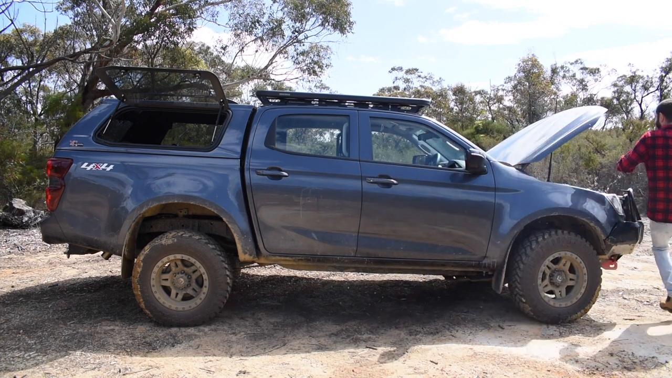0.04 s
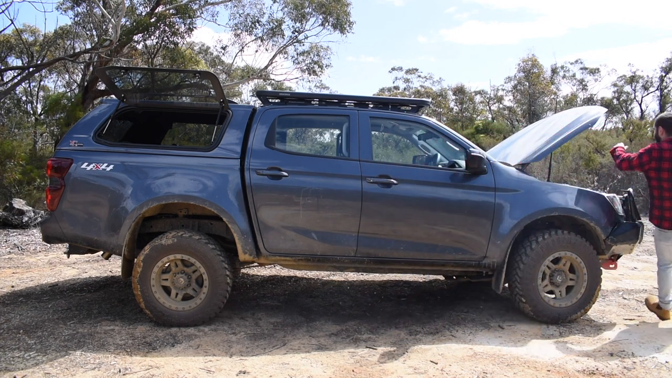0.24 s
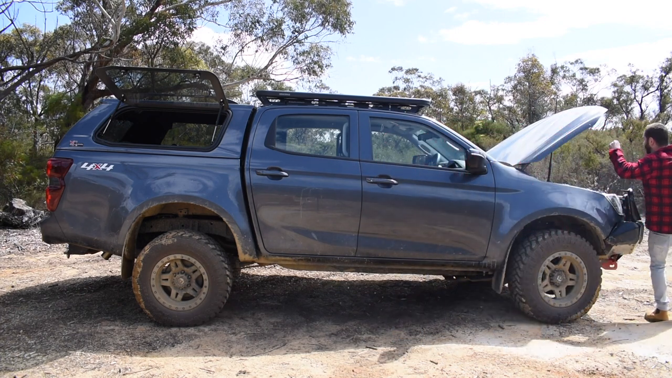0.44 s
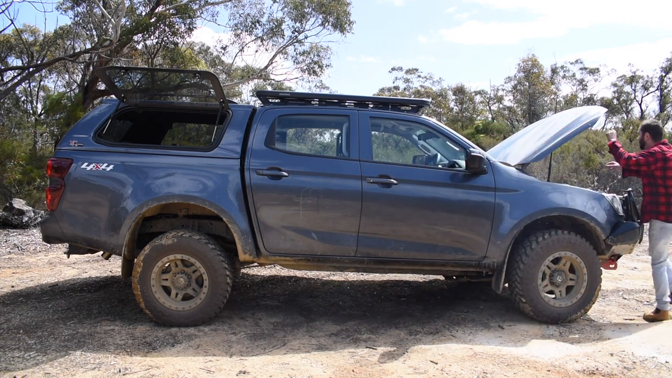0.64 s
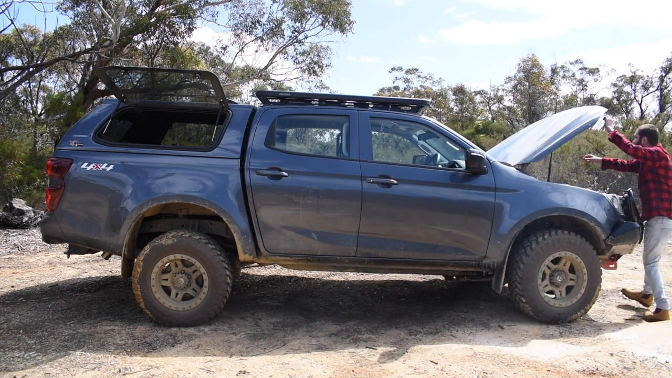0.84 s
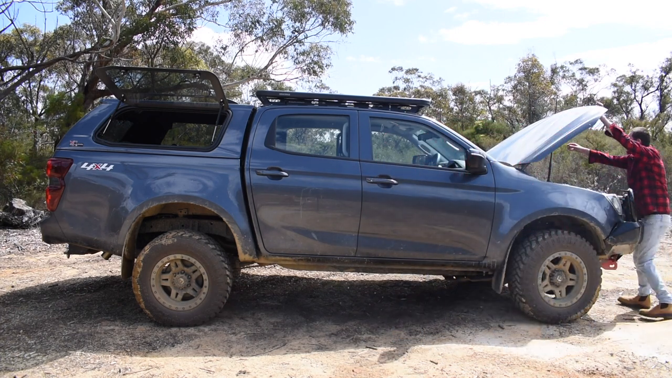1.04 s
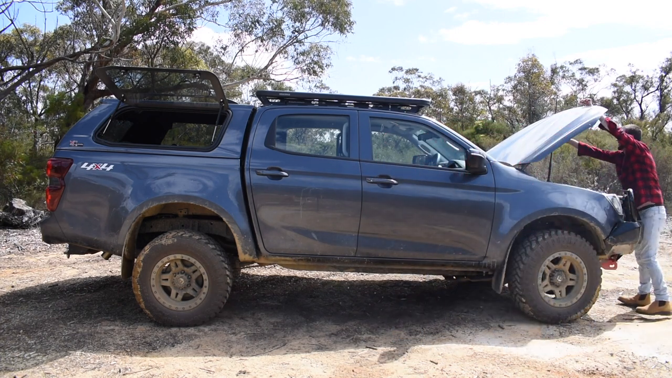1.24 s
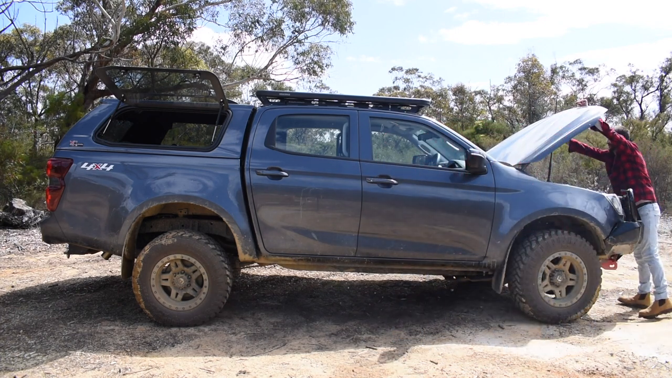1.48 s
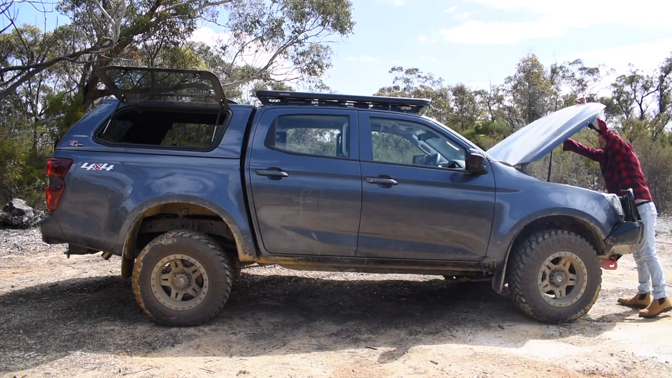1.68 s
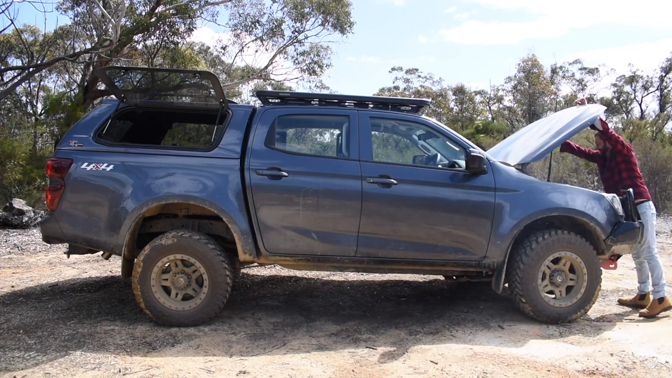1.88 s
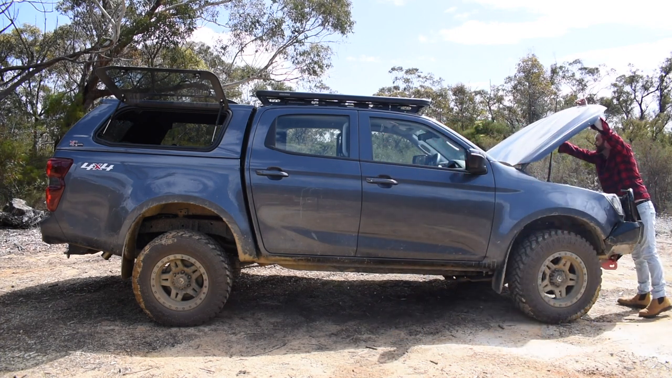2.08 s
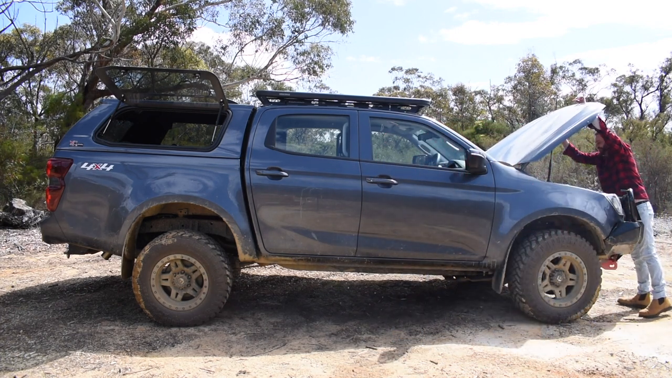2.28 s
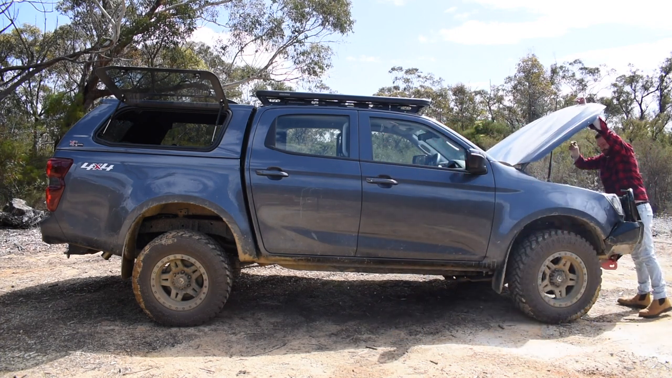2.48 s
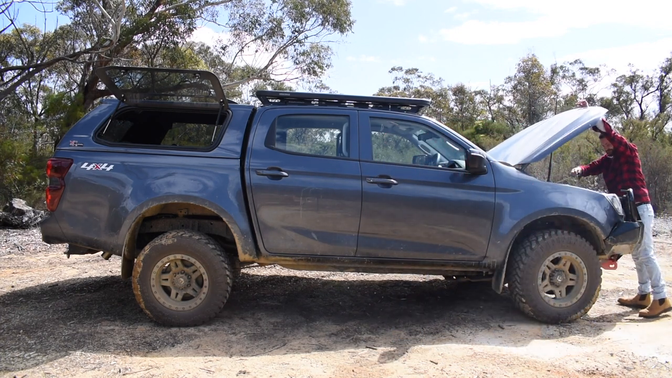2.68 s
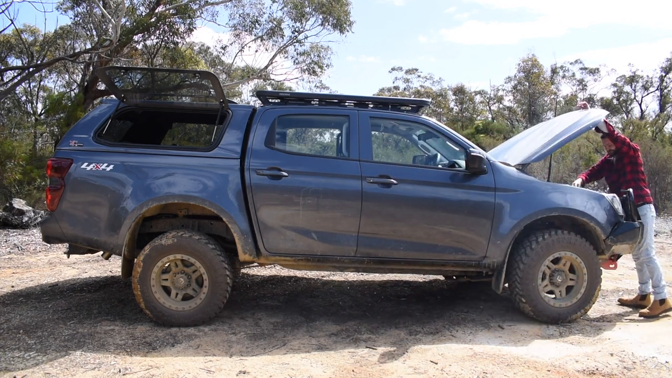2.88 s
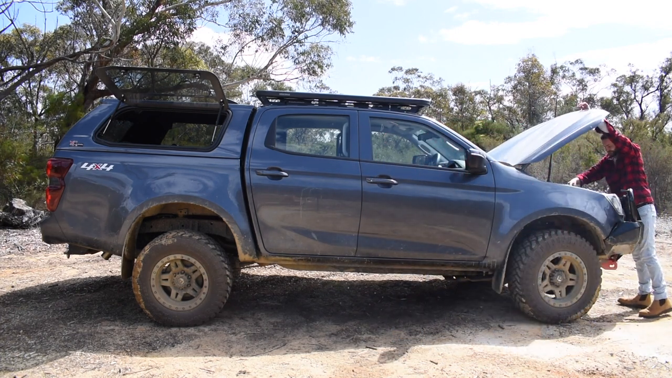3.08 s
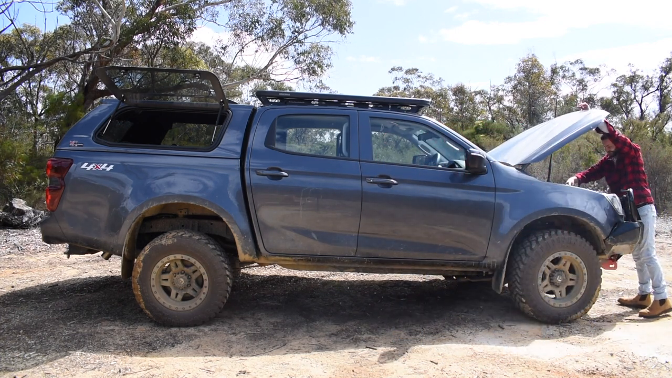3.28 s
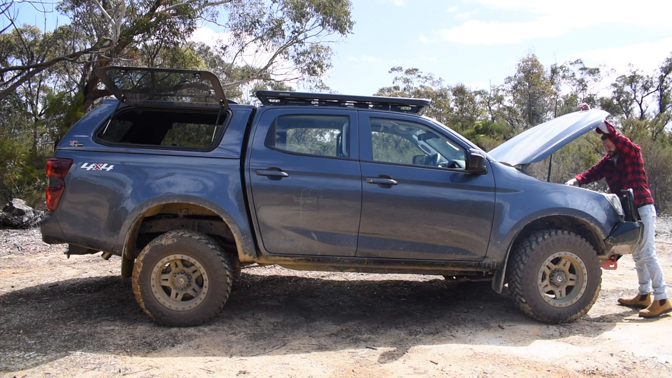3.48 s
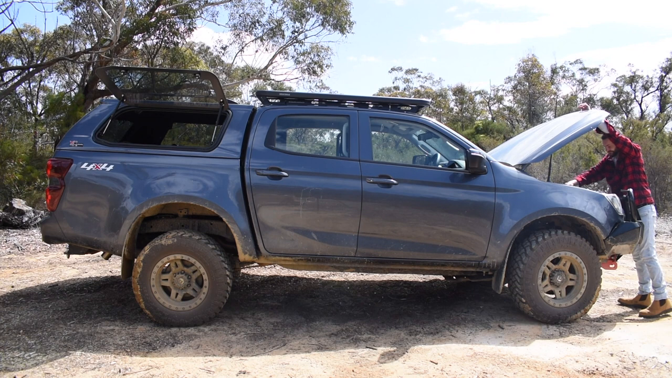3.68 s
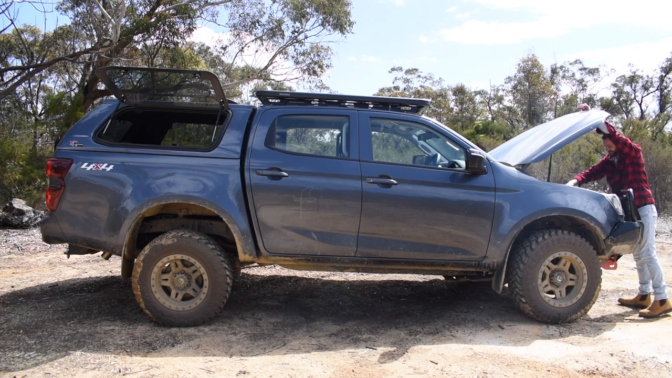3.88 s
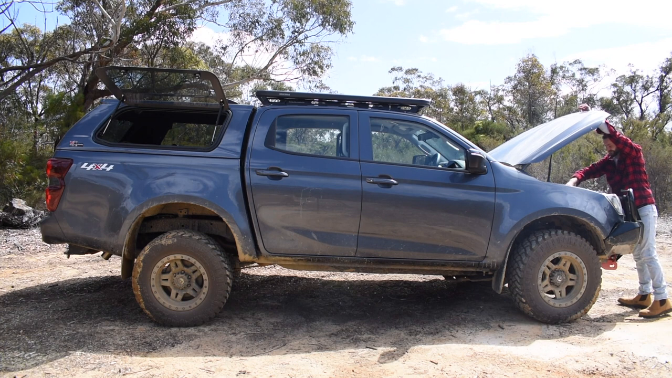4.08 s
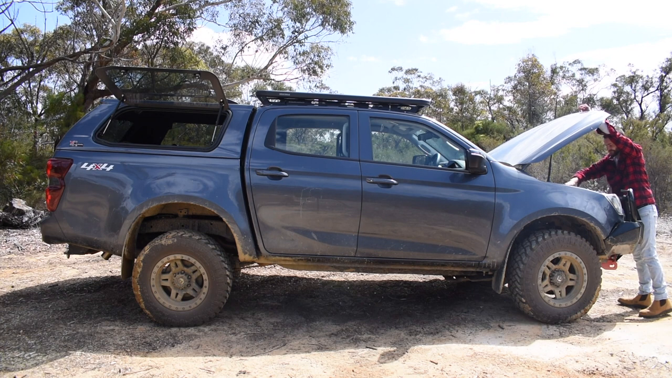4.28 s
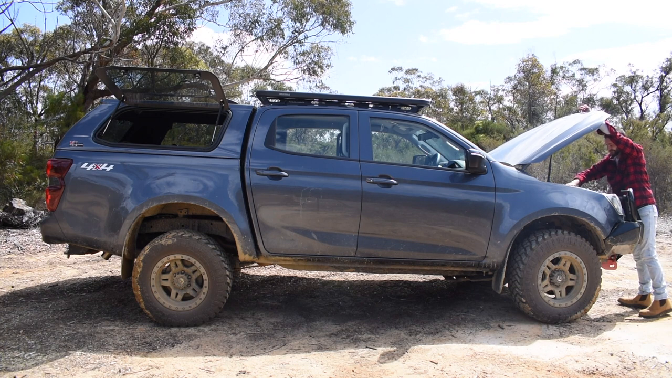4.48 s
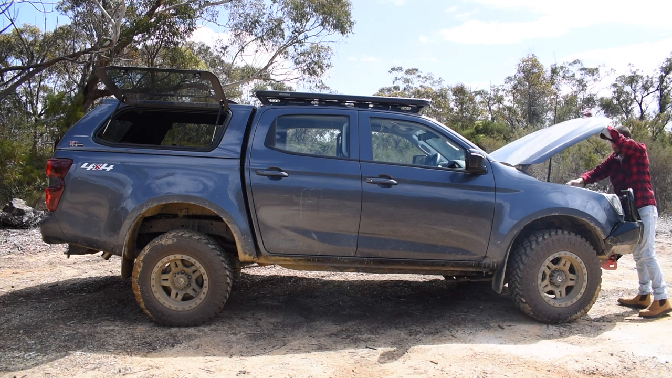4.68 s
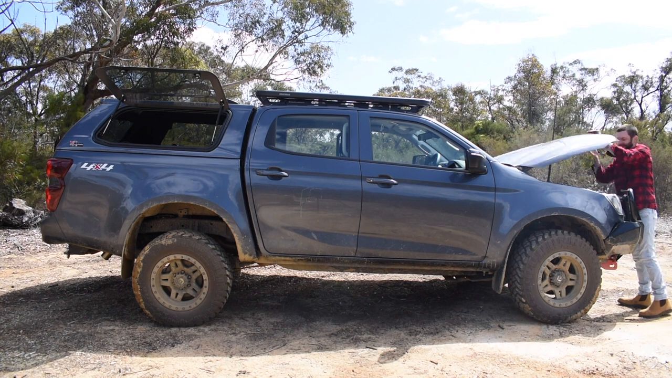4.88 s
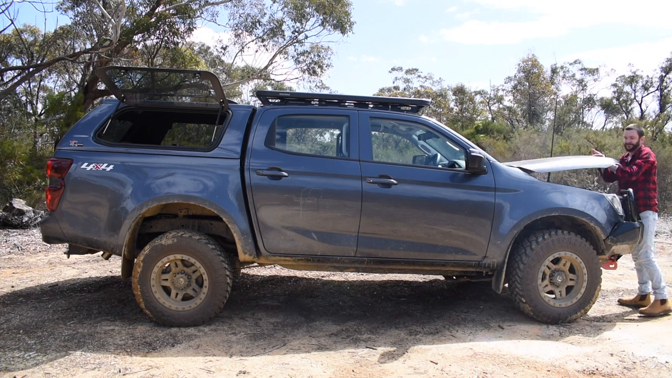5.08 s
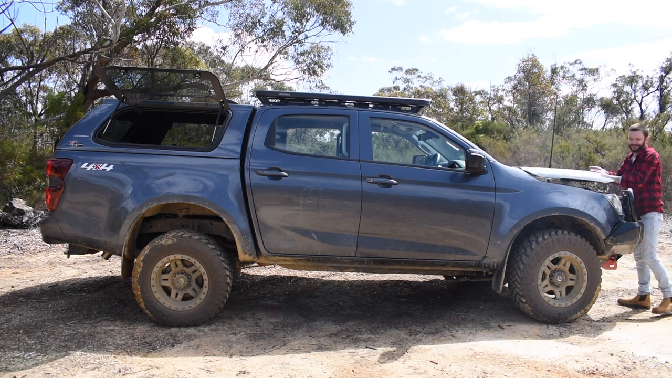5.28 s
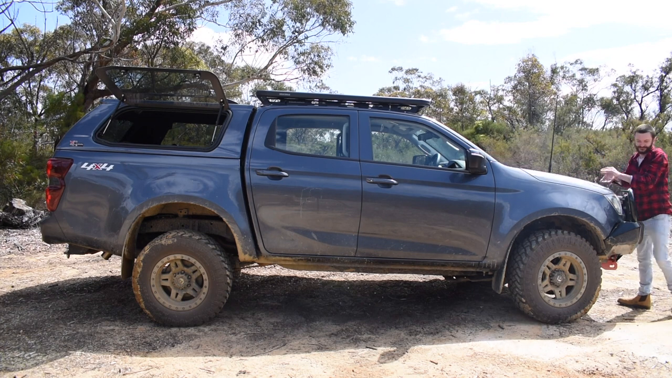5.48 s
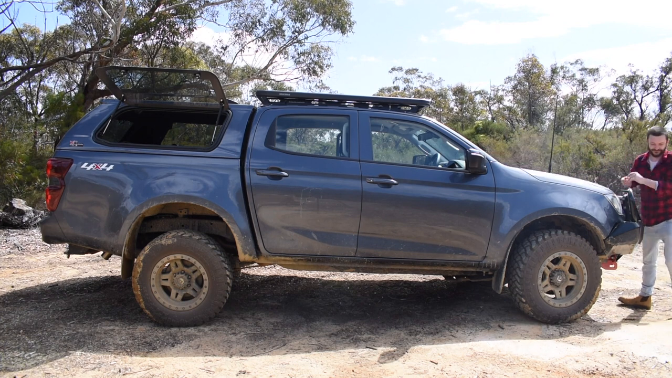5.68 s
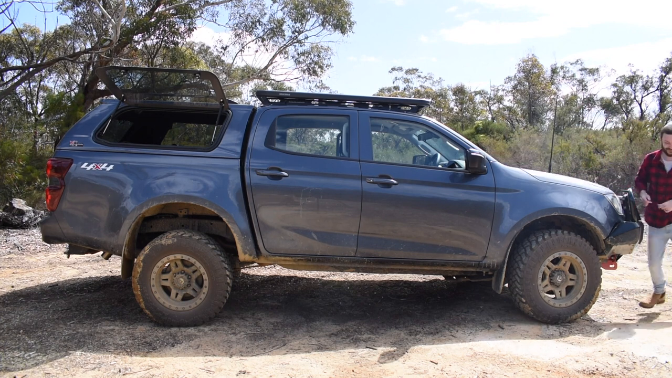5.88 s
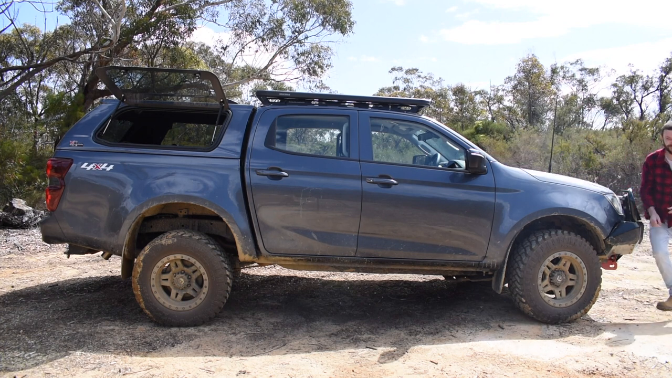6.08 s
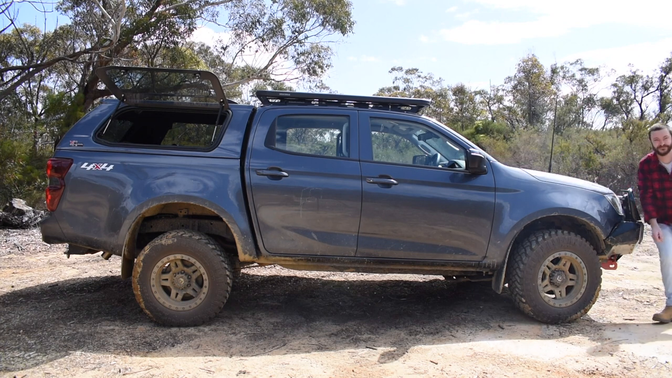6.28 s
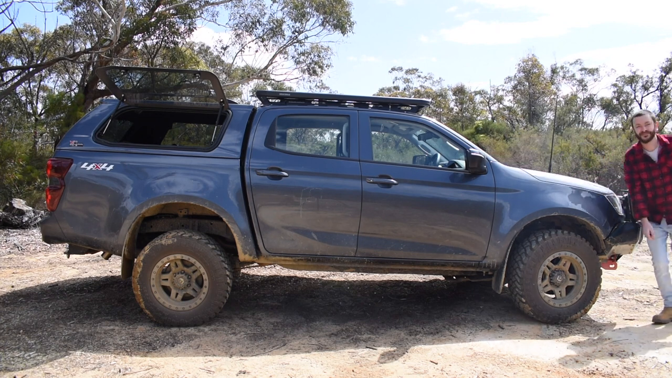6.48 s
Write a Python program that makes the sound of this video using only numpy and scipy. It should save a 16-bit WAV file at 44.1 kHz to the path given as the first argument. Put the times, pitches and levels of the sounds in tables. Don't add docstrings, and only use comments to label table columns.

```python
import sys
import numpy as np
from scipy import signal
from scipy.fft import rfft, irfft, next_fast_len
from scipy.io import wavfile
from scipy.ndimage import uniform_filter1d

SR = 44100
rng = np.random.default_rng(int(sys.argv[2]) if len(sys.argv) > 2 else 0)


def materialize(psi):
    bounded = np.clip(np.atleast_2d(psi).T, -1, 1)
    quanta = np.round(bounded * 32767).astype(np.int16)
    wavfile.write(sys.argv[1], SR, quanta)


def magnitude_from_level(level_db):
    exponent = np.asarray(level_db, float) / 20
    return 10 ** exponent


N = 288069

# frequency in Hz, level in dB per Hz.
SCUFF_TONE = [(88, -45), (150, -4), (431, -11), (790, -1.5), (960, -8.5), (1190, -6.5), (1360, -16),
              (11500, -33.5), (16000, -44.5)]
# frequency in Hz, t60 in seconds.
DRY_RING = [(200, 0.063), (1000, 0.0073), (4000, 0.036), (12000, .015)]
# frequency in Hz, t60 in seconds.
PROPPED_RING = [(40, 0.046), (120, 0.28), (230, 0.44), (400, 0.38), (800, 0.22), (2000, 0.18),
                (4000, 0.084), (12000, 0.058)]
# frequency in Hz, t60 in seconds.
ROD_RING = [(100, 0.29), (500, 0.16), (1500, 0.075), (3000, 0.061), (12000, 0.014)]
# frequency in Hz, t60 in seconds.
CLIP_RING = [(100, 0.5), (500, 0.17), (1500, 0.097), (3000, 0.05), (12000, 0.0214)]


def evened(x):
    return x / np.sqrt(np.mean(x ** 2) + 1e-20)


def read(points, hz):
    f, value = np.transpose(points)
    return np.interp(np.log(hz + 1), np.log(f + 1), value)


def coloured(tone, size, lo_hz=0, hi_hz=30000):
    fast = next_fast_len(size)
    hz = np.fft.rfftfreq(fast, 1 / SR) + 1
    edges = 1 / (1 + (lo_hz / hz) ** 6) / (1 + (hz / hi_hz) ** 6)
    spectrum = rfft(rng.standard_normal(fast)) * magnitude_from_level(read(tone, hz)) * edges
    return evened(irfft(spectrum, fast)[:size])


def rings(modes, size):
    hz, db, t60 = np.transpose(modes)[:, :, None]
    t = np.arange(size) / SR
    return (magnitude_from_level(db - 60 * t / t60) * np.sin(2 * np.pi * hz * t)).sum(0)


def crowd(tone, ring, lo_hz, hi_hz, size):
    t = np.arange(size) / SR
    middles = np.geomspace(lo_hz, hi_hz, num=6)
    place = np.interp(np.log(np.fft.rfftfreq(size, 1 / SR) + 1), np.log(middles), np.arange(6))
    share = np.maximum(1 - abs(place - np.arange(6)[:, None]), 0)
    bands = irfft(rfft(coloured(tone, size, lo_hz, hi_hz)) * share, size)
    swell = np.sin(np.pi / 2 * np.minimum(t * hi_hz / 2, 1)) ** 2
    return bands, swell * magnitude_from_level(-60 * t / read(ring, middles)[:, None])


def hits(rows, tone, ring, size, modes=None, crowd_db=0, hush=1.4, rise=0.0011, free=1.01, choke=.03, soft=0):
    out = np.zeros(N + size)
    t = np.arange(size) / SR
    strong = rings(modes, size) * np.minimum(t / rise, 1) if modes else 0
    crowds = crowd(tone, ring, 25, 960, size), crowd(tone, ring, 1000, 4800, size)
    hiss = coloured(tone, 4 * size, 4600, 15800)
    times = np.array([row[0] for row in rows])
    for s, db, clatter_db, rattle_db, contact in rows:
        onset = np.minimum(t / (rise + soft * contact), 1)
        grip = onset * np.exp(-(t / np.clip(contact, 3e-4, .05)) ** 2)
        roughness = rng.standard_normal(size=4096)
        spot = rng.integers(3 * size)
        push = roughness * (grip * (1 + 2.0 * np.exp(-t / 0.002)))[:len(roughness)]
        push = push / np.linalg.norm(push)
        bodies = np.array([(np.roll(bands, spot, axis=1) * decays).sum(0) for bands, decays in crowds])
        gap = np.min(times[times > s] - s, initial=1)
        factor = np.clip(min(free, gap / choke), .3, 1.3)
        damp = magnitude_from_level(-120 * t * (1 / factor - 1))
        panel, clatter = signal.fftconvolve(push[None], bodies * damp, axes=1)[:, :size]
        bright = grip + onset * magnitude_from_level(-60 * t / read(ring, 12000) / hush)
        rattle = hiss[spot:][:size] * bright
        parts = np.array([magnitude_from_level(crowd_db) * panel + strong * damp, clatter, rattle])
        peaks = np.sqrt(uniform_filter1d(parts[:, :len(roughness)] ** 2, size=200).max(axis=1))
        gains = magnitude_from_level(db - 5.5 + np.array([0, clatter_db, rattle_db])) / peaks
        out[round((s + .0015) * SR):][:size] += gains @ parts
    return out[:N]


def lumps(rate_hz, depth_db):
    knots = rng.standard_normal(2800)
    return magnitude_from_level(depth_db * np.interp(np.arange(N) / SR * rate_hz, np.arange(len(knots)), knots))


def air():
    # time in seconds, wind level in dB.
    gusts = [(0.0, -51.5), (0.42, -56), (0.65, -60.5), (1.45, -65.5), (1.89, -49.5), (2.05, -56),
             (2.6, -64), (3.31, -70), (3.69, -67), (4.04, -66.5), (4.51, -71), (4.62, -62), (4.86, -61),
             (5.47, -64.5), (5.62, -38), (5.65, -50), (5.86, -48.5), (6.53, -60.5)]
    # time in seconds, cloth hiss in dB.
    moving = [(0, -74.5), (.2, -83), (.45, -73.5), (.7, -76), (1.05, -72), (1.42, -73.5), (1.58, -76),
              (2.2, -81), (2.4, -78), (2.93, -79), (3.099, -85), (4.6, -82), (4.85, -77.5), (5.46, -72.5),
              (5.698, -73.5), (6.13, -80.5), (6.3, -74.5), (6.45, -73.5), (6.53, -68.5)]
    # frequency in Hz, level in dB per Hz.
    wind_tone = [(8.8, -40.5), (15, -4), (32, 6.5), (48, 0.5), (111, -15.5), (146, -35.5), (200, -22.5),
                 (260, -57.5), (440, -120)]
    rustle_tone = [(59, -36.5), (100, 10), (225, 1.5), (413, 0), (605, -6), (744, -4), (1500, -11),
                   (4500, -19.5), (5850, -51), (9900, -120)]
    hiss_tone = [(1760, -35), (3000, 6), (5580, -1.5), (6250, -7), (6860, -7), (12900, -12), (15000, -11.5),
                 (15700, -35)]
    t = np.arange(N) / SR
    wind_db = np.interp(t, *np.transpose(gusts))
    hiss_db = np.interp(t, *np.transpose(moving))
    rustle_db = -64.5 + 0.73 * (hiss_db + 76.5)
    grain = lumps(86, 1.4)
    wind = evened(coloured(wind_tone, N, 0, 180) * lumps(4.7, 1.0))
    rustle = evened(coloured(rustle_tone, N, 120, 6300) * grain * lumps(15, 2.3))
    fine_hiss = evened(coloured(hiss_tone, N, 5500) * grain)
    return magnitude_from_level(9.0 + wind_db) * wind + magnitude_from_level(rustle_db) * rustle + magnitude_from_level(hiss_db) * fine_hiss


def scuffs():
    # start in seconds, panel level in dB,
    # clatter and rattle in dB re panel, contact in seconds.
    scrapes = [(0.029, -61, 0.5, -10, 0.06), (0.465, -60.5, 2.5, -7, 0.081), (0.522, -48.5, -1, -10, 0.042),
               (0.628, -60.5, -1.5, -36, 0.056), (0.743, -49, -15, -44, 0.02), (0.572, -68, -20, 6, 0.0098),
               (1.4, -71, -20, 7, 0.02), (1.439, -66.5, -22, 11.5, 0.027), (1.512, -48, -23, -12, 0.019),
               (1.475, -69, -20, 7, 0.022), (1.545, -69, -20, 4, 0.021), (1.642, -47.5, -28, -38.5, 0.017),
               (3.009, -57.5, -3, -12, 0.076), (3.047, -65, 5, 2.5, 0.023),
               (4.078, -56.5, -10, -10.5, 0.029), (4.122, -61, 0, -7, 0.146),
               (4.17, -57.5, -13, -13, 0.037), (6.164, -53.5, -2.5, -16, 0.0033),
               (6.303, -45, -4, -13.5, 0.032), (6.33, -45, -8.5, -25, 0.015),
               (1.183, -72, 16, -12, 0.083), (1.30, -59, 4, -13, 0.074), (1.36, -59, -5, -1, 0.028),
               (1.685, -51, -1, -6, 0.098), (1.816, -61, -12, -2.5, 0.033), (2.046, -66, -2, 3, 0.00065),
               (4.59, -53.5, 0, -15, 0.054), (4.82, -51, -23, -15, 0.0085), (4.941, -72, -14, 8, 0.01),
               (3.46, -62, -23, -5, .04), (2.698, -55, -12, -15, 0.05), (5.905, -52, -7.5, -26, 0.043),
               (5.989, -60, -6, -4, 0.0066)]
    return hits(scrapes, SCUFF_TONE, DRY_RING, size=6000, rise=0.0015, choke=.005, soft=0.077)


def grit():
    # start in seconds, panel level in dB, clatter and rattle in dB re panel.
    crunches = [(0.076, -48.5, -6, -34), (0.129, -49, -8, -21.5), (1.854, -47, -9, -32.5),
                (2.371, -52, -1.5, -4.5), (2.425, -48, -3, -8), (2.486, -44.5, -3, -12.5),
                (2.521, -60, -11, -28), (2.569, -48, -19, -27), (2.582, -49, -6, -17),
                (2.61, -48.5, -9, -18), (2.618, -48.5, -10, -15), (2.644, -51.5, 1, -3),
                (2.654, -48, -7, -15), (2.753, -56.5, 0, -7), (2.964, -54.5, -26, -11),
                (6.342, -50, -18, -27), (6.449, -52, -3.5, -34)]
    contact_s = .0008
    return hits([(*row, contact_s) for row in crunches], SCUFF_TONE, DRY_RING, size=4096, hush=0.45,
                rise=0.00012, choke=.005, free=0.27)


def pats():
    # start in seconds, panel level in dB, clatter and
    # rattle in dB re panel, contact in seconds.
    palms = [
        (1.1, -46.5, -9.5, -40, 0.032),
        (1.138, -40.5, -15, -40, 0.0089),
        (1.537, -42.5, -6.5, -26, 0.0065),
        (1.56, -46, -13, -32, 0.042),
        (1.64, -53, -3, -30, 0.0037),
    ]
    slam_tail = [
        (5.69, -42, -11, -25, .01),
        (5.735, -43.5, -8.5, -35, 0.029),
        (5.8, -48, -6, -36, 0.045),
        (5.87, -50.5, -6, -30, 0.031),
    ]
    # frequency in Hz, level in dB per Hz.
    tone = [(120, -21), (250, -9), (410, -0.5), (700, -5.5), (1200, -8), (2200, -24), (12000, -49.5)]
    # frequency in Hz, level in dB, t60 in seconds.
    modes = [(290, -8.5, .08), (410, 0, 0.11), (1150, -16.5, 0.022)]
    return hits(palms + slam_tail, tone, ROD_RING, size=6000, modes=modes, crowd_db=2.5, rise=.002, choke=.01)


def knocks():
    # start in seconds, panel level in dB, clatter and rattle in dB re panel, contact in seconds.
    blows = [
        (1.669, -32, -22, -35.5, 0.05),
        (1.705, -6.5, -20, -35, 0.011),
        (1.712, -13.5, -10, -28.5, 0.0051),
        (1.721, -11, -16, -31.5, 0.013),
        (1.741, -13, -31.5, -45, 0.026),
        (1.749, -32.5, -12.5, -19, 0.0032),
        (1.769, -25.5, -26.5, -26, 0.0076),
        (1.797, -35.5, -19, -26.5, 0.013),
        (1.979, -37.5, -19.5, -29, 0.024),
    ]
    # frequency in Hz, level in dB per Hz.
    tone = [(18, -44), (30, -12.5), (59, -27.5), (131, -15.5), (239, -4.5), (303, -6), (632, -11.5),
            (800, -22), (1760, -36), (1910, -37), (4650, -45.5), (14500, -47.5), (16000, -60)]
    # frequency in Hz, level in dB, t60 in seconds.
    modes = [(57.6, -1, 0.099), (76.2, -11, 0.31), (107, -9, 0.46), (190, -18.5, 0.5), (233.2, 4, 0.21),
             (255, 2, 0.17), (266, -16, 0.9), (347, -3.5, 0.3), (398.4, -5.5, 0.25), (457, -6.5, .15),
             (652, -7.5, 0.18), (828, -15, 0.3), (1110, -7, 0.074)]
    return hits(blows, tone, PROPPED_RING, size=20000, modes=modes, crowd_db=-2.5, free=1.5, choke=0.015)


def clunks():
    # start in seconds, panel level in dB, clatter and rattle in dB re panel, contact in seconds.
    blows = [
        (2.052, -24, -11.5, -37, 0.016),
        (2.059, -17, -28, -43, 0.022),
        (2.145, -17, -14, -29, 0.02),
        (2.154, -29, -8.5, -14, 0.0062),
        (2.172, -17, -18, -25.5, 0.0055),
        (2.205, -29, -29, -50, 0.017),
        (2.275, -38.5, -40, -45, 0.0086),
    ]
    # frequency in Hz, level in dB per Hz.
    tone = [(18, -47), (30, -19), (131, -6), (239, -6), (684, -17.5), (1670, -31), (3000, -37.5),
            (4530, -46.5), (13000, -46), (16000, -60)]
    # frequency in Hz, level in dB, t60 in seconds.
    modes = [(70.4, -16, 0.5), (144.4, -17.5, 0.55), (241.5, 6.5, 0.11), (252, -17, 0.2), (361, -8, 0.38),
             (419, 3, 0.085), (533, -11.5, 0.29), (615, -22, 0.33), (810, -4.5, 0.028)]
    return hits(blows, tone, PROPPED_RING, size=16000, modes=modes, crowd_db=-3.5, rise=0.0024,
                free=1.3, choke=0.015)


def rubs():
    # start in seconds, panel level in dB, clatter and rattle in dB re panel, contact in seconds.
    strokes = [
        (2.73, -54.5, -6, -25, 0.055),
        (2.78, -55.5, -9, -25, 0.073),
        (2.83, -56.5, -13, -21.5, 0.025),
        (2.88, -64, -17, -22, 0.059),
    ]
    # frequency in Hz, level in dB per Hz.
    tone = [(120, -39), (200, -4), (412, -15), (530, -7), (748, 6), (1220, -17), (3470, -14), (15000, -40)]
    return hits(strokes, tone, CLIP_RING, size=6000, rise=0.003, soft=0.3)


def clatter():
    # start in seconds, panel level in dB, clatter and rattle in dB re panel, contact in seconds.
    taps = [
        (3.28, -51, -20, -34, 0.0056),
        (3.321, -41.5, -16, -27, 0.016),
        (3.427, -40.5, -5.5, -17, 0.017),
        (3.543, -32.5, -2.5, -22, 0.014),
        (3.561, -30.5, -2, -25, 0.0051),
        (3.592, -34, -5, -20, 0.0036),
    ]
    # frequency in Hz, level in dB per Hz.
    tone = [(18, -51), (30, -18), (239, -14.5), (426, -9), (560, -15), (820, -8), (1100, -20.5),
            (1460, -2.5), (2000, -2), (2600, 1.5), (3400, -10), (4300, -16), (11100, -19), (14500, -18),
            (16000, -43.5)]
    # frequency in Hz, level in dB, t60 in seconds.
    modes = [(172, -5.5, 0.28), (250, 0.5, 0.21), (326, -3, 0.16), (530, -3.5, 0.058), (706, -8, 0.11),
             (826, 2, 0.063), (1490, -3, 0.044), (2510, -13, 0.033)]
    return hits(taps, tone, ROD_RING, size=12000, modes=modes, crowd_db=7.5, free=1.4, choke=0.031)


def drops():
    # start in seconds, panel level in dB, clatter and rattle in dB re panel, contact in seconds.
    bounces = [
        (3.65, -31.5, 2, -25, 0.014),
        (3.659, -28, -14, -25.5, 0.019),
        (3.671, -25.5, -12, -31, 0.018),
        (3.703, -29, -6.5, -30, 0.0096),
        (3.716, -27, -7, -32, 0.012),
        (3.724, -33, -13, -37, 0.016),
        (3.737, -29.5, -15.5, -46, 0.023),
        (3.769, -40, -21, -45, 0.011),
    ]
    # frequency in Hz, level in dB per Hz.
    tone = [(24, -49), (40, -23), (305, -7.5), (663, -14), (733, -11), (1440, -8), (3650, -32),
            (13100, -49), (16000, -67)]
    # frequency in Hz, level in dB, t60 in seconds.
    modes = [(264, -1, 0.15), (516, 5.5, 0.082), (761, 0.5, 0.13), (959, 2.5, 0.1), (1120, -4, 0.12),
             (1210, -23, .35), (1470, -3.5, 0.078)]
    # frequency in Hz, t60 in seconds.
    ring = [(100, 0.38), (500, 0.22), (1500, 0.11), (3000, 0.1), (12000, 0.018)]
    return hits(bounces, tone, ring, size=10000, modes=modes, crowd_db=3.5, free=1.56, choke=0.016)


def snaps():
    # start in seconds, panel level in dB, clatter and rattle in dB re panel, contact in seconds.
    clicks = [
        (4.2165, -38.5, 2, -7, 0.0098),
        (4.2335, -48.5, 10, 10, 0.0055),
        (4.2365, -38, 7, -13, 0.0059),
        (4.256, -43.5, 1.5, -21, 0.0069),
        (4.283, -54, -14, -36, 0.011),
    ]
    # frequency in Hz, level in dB per Hz.
    tone = [(35, -43), (60, -11), (200, -3), (800, 0), (1110, -17.5), (1550, 1.5), (2200, -10.5),
            (3000, -9), (4600, -22), (11000, -16), (16000, -42)]
    # frequency in Hz, level in dB, t60 in seconds.
    modes = [(150.6, -3.5, 0.26), (820, -8, 0.064), (1520, -8, 0.046)]
    return hits(clicks, tone, CLIP_RING, size=8000, modes=modes, crowd_db=4.0, rise=0.00079,
                free=2.1, choke=0.012)


def rests():
    # start in seconds, panel level in dB, clatter and rattle in dB re panel, contact in seconds.
    touches = [
        (4.457, -51, 7, 3, 0.0042),
        (4.465, -25, -13.5, -18.5, 0.0065),
        (4.474, -44, -29, -28, 0.005),
        (4.481, -26, -33, -30, 0.0036),
        (4.494, -32, -26, -31, 0.0044),
    ]
    # frequency in Hz, level in dB per Hz.
    tone = [(24, -44), (91, 2), (185, -3.5), (372, -14.5), (800, -19.5), (1600, -37), (2500, -25.5),
            (4200, -57), (7000, -65), (12000, -51), (16000, -48)]
    # frequency in Hz, level in dB, t60 in seconds.
    modes = [(110, -3.5, 1), (129.7, -11, 1), (188, 0, 0.25), (250.4, -9.5, 0.18), (346, 5, 0.072),
             (382, -13.5, 0.37), (800, -7, 0.092)]
    # frequency in Hz, t60 in seconds.
    ring = [(40, 0.37), (300, 0.55), (1000, 0.12), (3000, 0.065), (12000, 0.04)]
    return hits(touches, tone, ring, size=12000, modes=modes, crowd_db=-2.0, hush=0.36, free=1.4, choke=0.017)


def thuds():
    # start in seconds, panel level in dB, clatter and rattle in dB re panel, contact in seconds.
    blows = [
        (4.625, -11, -18, -31, 0.006),
        (4.631, -19.5, -11, -32, 0.0046),
        (4.646, -21, -25, -28, 0.0082),
    ]
    # frequency in Hz, level in dB per Hz.
    tone = [(18, -56), (45, -46), (110, -10), (184, -5.5), (390, -9), (630, -16.5), (1500, -29.5),
            (3500, -37.5), (6000, -38.5), (14500, -36), (16000, -63.5)]
    # frequency in Hz, level in dB, t60 in seconds.
    modes = [(102, -38, 0.13), (125.6, -4.5, 0.44), (182, -7, 0.28), (265, 0.5, 0.044), (393.4, 5, 0.1),
             (350, -11, 0.45), (638, -2.5, 0.085), (810, -4, 0.056)]
    # frequency in Hz, t60 in seconds.
    ring = [(40, 0.47), (300, 0.36), (1000, 0.22), (4000, 0.096), (12000, 0.016)]
    return hits(blows, tone, ring, size=16000, modes=modes, crowd_db=-2.5, hush=0.93, free=0.89, choke=0.021)


def flexes():
    # start in seconds, panel level in dB, clatter and rattle in dB re panel, contact in seconds.
    pops = [
        (5.065, -27.5, -24, -32, 0.0085),
        (5.079, -22, -39, -41, 0.0042),
    ]
    # frequency in Hz, level in dB per Hz.
    tone = [(24, -46), (100, -16), (237, -3), (276, -12), (372, -10), (800, -29.5), (1200, -43),
            (12800, -61), (16000, -69.5)]
    # frequency in Hz, level in dB, t60 in seconds.
    modes = [(147.8, -11, 0.53), (206.5, -10.5, 0.24), (243, 5.5, .11), (306, -9.5, 0.32), (377, -12, 0.43),
             (476, -10, 0.24), (570, -17, 0.29), (824, -9, 0.093)]
    return hits(pops, tone, PROPPED_RING, size=14000, modes=modes, crowd_db=2.0, rise=0.00091,
                free=0.97, choke=0.015)


def catch():
    # start in seconds, panel level in dB, clatter and rattle in dB re panel, contact in seconds.
    grazes = [
        (5.402, -43, -23, -44.5, 0.026),
        (5.42, -35.5, -28.5, -38.5, 0.061),
    ]
    # frequency in Hz, level in dB, t60 in seconds.
    modes = [(250, -14.5, 0.07), (480, -9, 0.12), (900, -25.5, .06)]
    return hits(grazes, SCUFF_TONE, DRY_RING, size=6000, modes=modes, crowd_db=-8.5, rise=0.0033, choke=.015)


def slam():
    # start in seconds, panel level in dB, clatter and rattle in dB re panel, contact in seconds.
    blows = [
        (5.4655, -2, -6, -9, 0.0051),
        (5.474, -8.5, -11.5, -13.5, 0.0075),
        (5.4815, 2.5, -12.5, -10.5, 0.03),
        (5.516, -10.5, -10, -27, 0.0093),
        (5.527, -3, -26, -34.5, 0.017),
        (5.648, -30.5, -8, -28, 0.0034),
    ]
    # frequency in Hz, level in dB per Hz.
    tone = [(15, -32.5), (25, -9), (317, -7), (600, -9), (1020, -19.5), (1300, -21.5), (2000, -26),
            (2690, -28.5), (3250, -28), (9570, -38.5), (13200, -31), (16000, -49.5)]
    # frequency in Hz, level in dB, t60 in seconds.
    modes = [(43.7, -5.5, 0.62), (66, -14.5, 0.78), (90, -24.5, 1), (161.4, -5.5, 0.64), (205, -11.5, 0.52),
             (270.2, -3, 0.15), (291.4, -2, 0.24), (303.4, -5.5, .5), (416.7, -15.5, 0.29),
             (452, -11, 0.21), (499.3, -9.5, 0.29), (566.2, -8.5, 0.19), (702, -9, 0.18),
             (835, -14.5, 0.25)]
    bracket_modes = [(291, -6.5, 0.11), (714, -12.5, 0.11), (350, -18, 0.61), (365.2, -20, 0.66),
                     (200.3, -21, .55), (690, -35.5, 0.41), (1295, -21, .12), (1340, -36.5, 0.68),
                     (1580, -34.5, 0.48), (12600, -21, .02), (592, -21, 0.21), (2197, -13, 0.064),
                     (4106, -2.5, 0.012), (5380, -31.5, .1)]
    # frequency in Hz, t60 in seconds.
    ring = [(40, 0.46), (200, 0.48), (600, 0.3), (1500, 0.21), (4000, .11), (12000, 0.025)]
    brackets = np.zeros(N)
    brackets[round((blows[0][0] + .002) * SR):][:30000] = rings(bracket_modes, size=30000)
    start_s, gap_s, first_db, fall_db = 5.546, 0.046, -11, -6.5
    contact_s, shrink = 0.033, 0.67
    rocks = [(start_s + k * gap_s, first_db + k * fall_db, -22, -36, contact_s * shrink ** k) for k in range(6)]
    out = hits(blows, tone, ring, size=28000, modes=modes, crowd_db=-4.0, free=1.04, choke=0.012)
    out += hits(rocks, tone, ring, size=20000, modes=modes, crowd_db=-1.5, rise=0.0098, free=0.98)
    return out + brackets


def puff():
    draw_s, push_s, flip_s, leak_s = .002, .007, .0015, .013
    draw, push, rebound = .9, 1.4, 1.3
    t = np.arange(N) / SR - 5.4954
    before = -draw * np.exp(np.minimum(t, 0) / draw_s)
    flipped = np.clip((t - push_s) / flip_s, 0, 1)
    leak = np.exp(-(np.maximum(t - push_s - flip_s, 0) / leak_s) ** 2)
    after = push * (1 - flipped) - rebound * flipped * leak
    return uniform_filter1d(np.where(t < 0, before, after), size=30)


def scene():
    out = air() + scuffs() + grit() + pats()
    out += knocks() + clunks() + rubs()
    out += clatter() + drops() + snaps()
    out += rests() + thuds() + flexes() + catch()
    out += slam() + puff()
    return out[None]


def band_limit(x):
    return signal.sosfilt(signal.butter(12, 16830, fs=SR, output="sos"), x)


def record(dry):
    clipped = np.clip(dry, -.46, .46)
    low_cut = signal.butter(2, 55, "highpass", fs=SR, output="sos")
    top_cut = signal.cheby2(12, 60, 17100, fs=SR, output="sos")
    sagging = signal.sosfilt(low_cut, clipped)
    return band_limit(signal.sosfilt(top_cut, sagging))


dry = scene()
out = record(dry)
materialize(out)
```